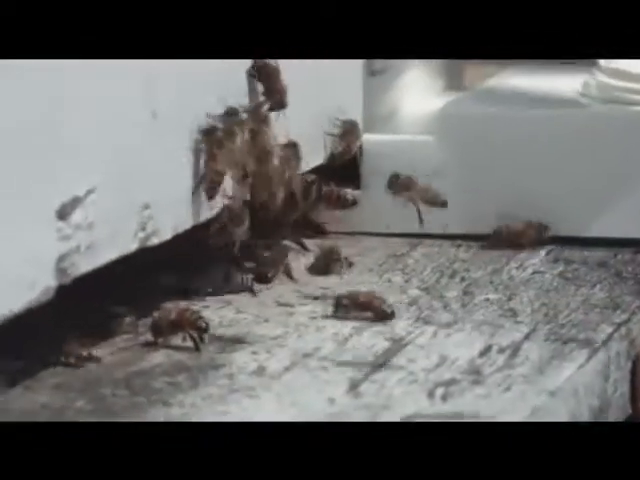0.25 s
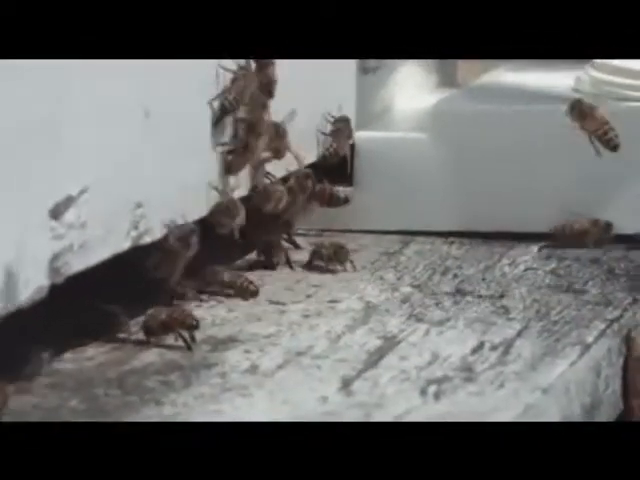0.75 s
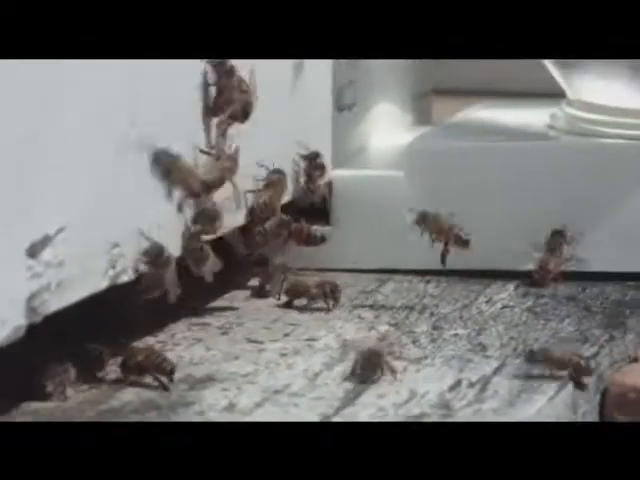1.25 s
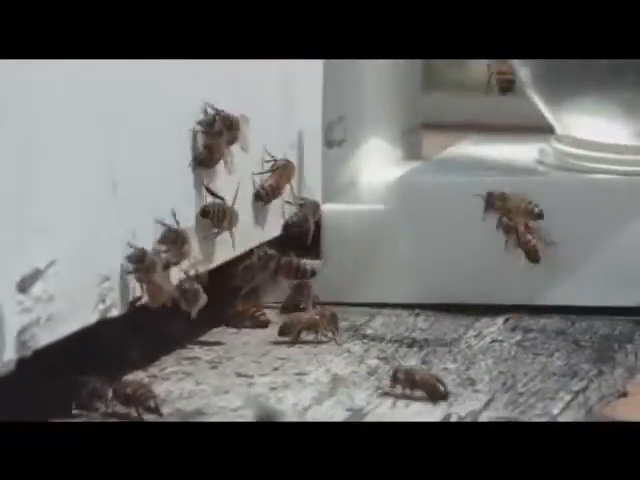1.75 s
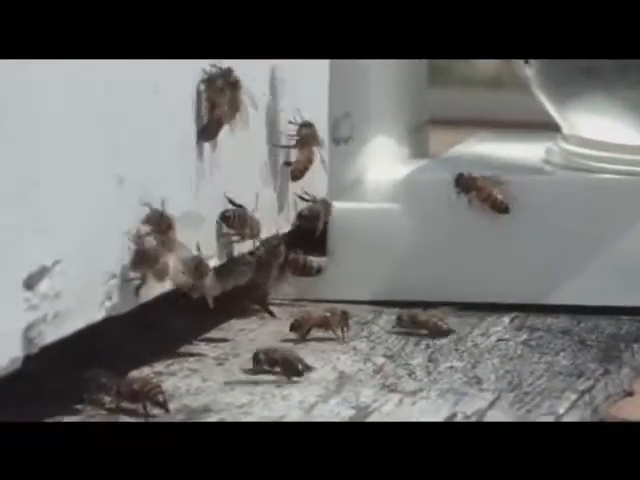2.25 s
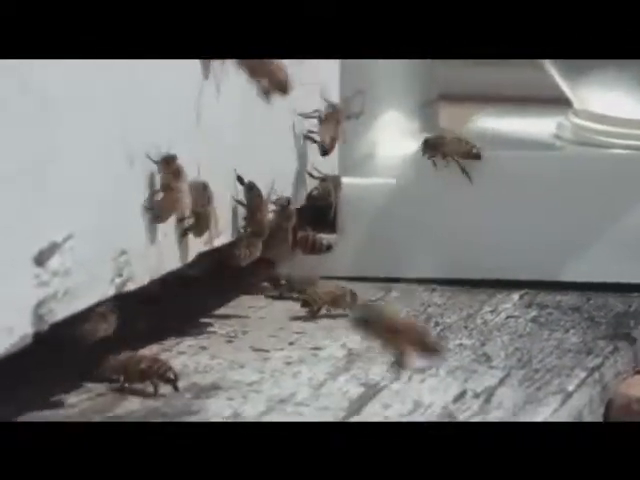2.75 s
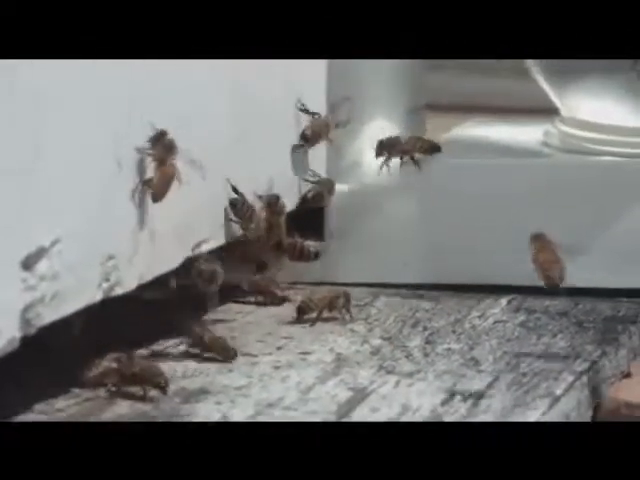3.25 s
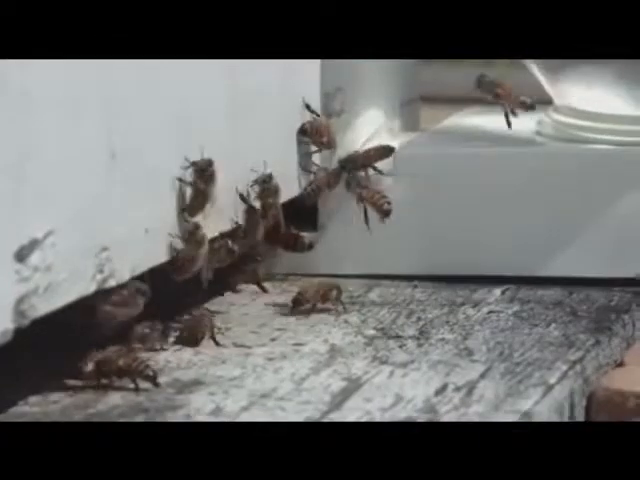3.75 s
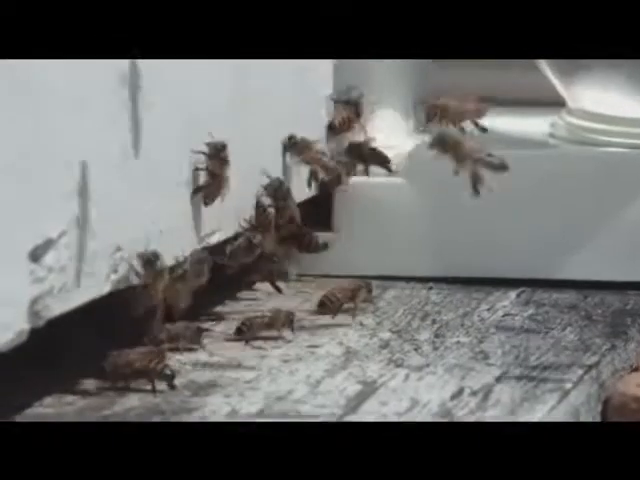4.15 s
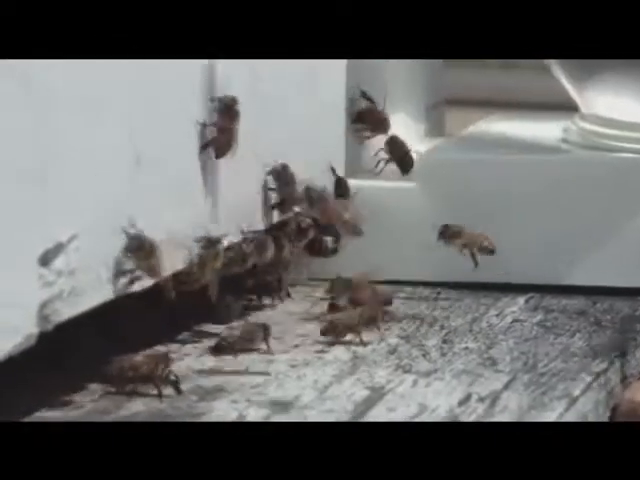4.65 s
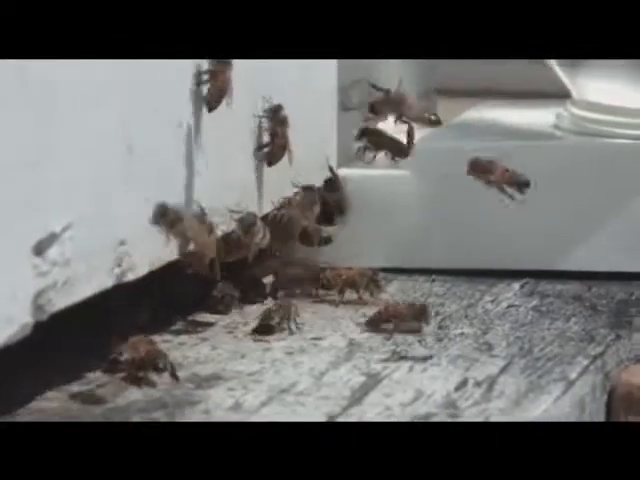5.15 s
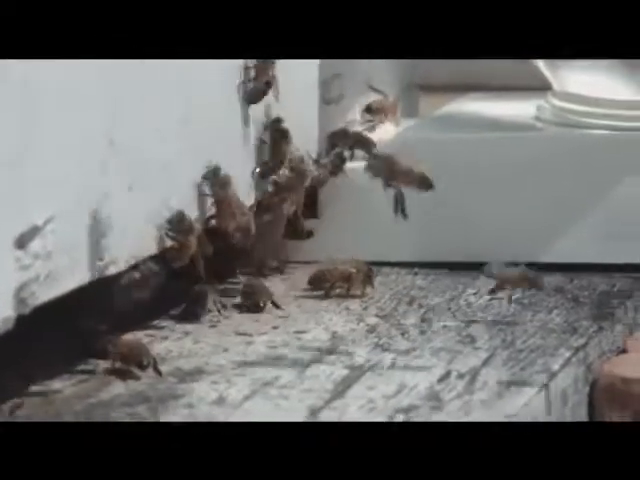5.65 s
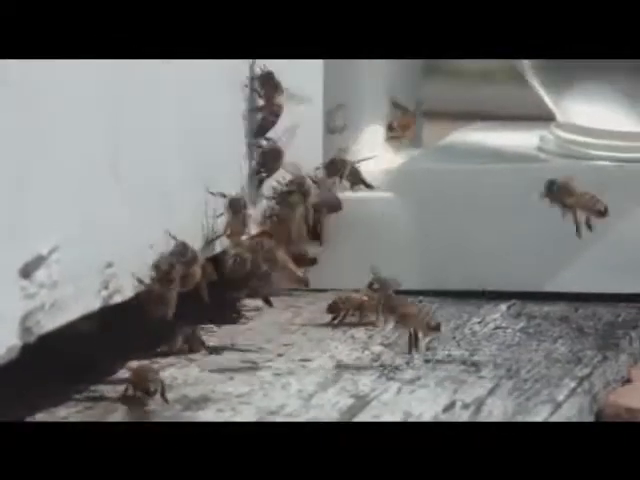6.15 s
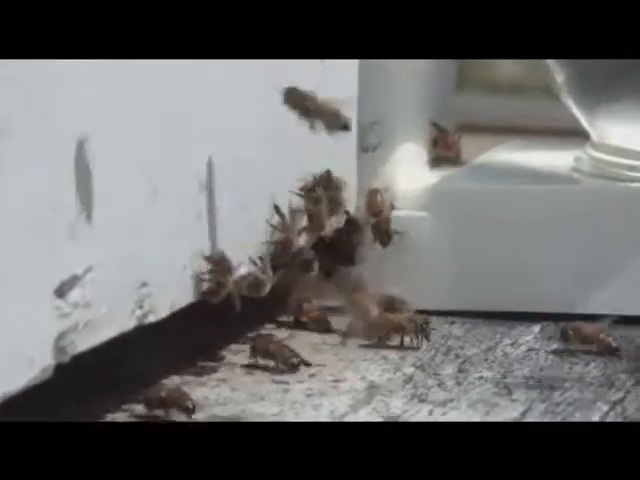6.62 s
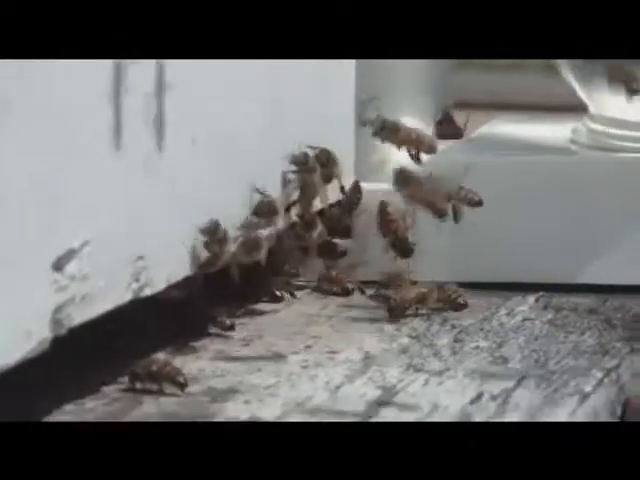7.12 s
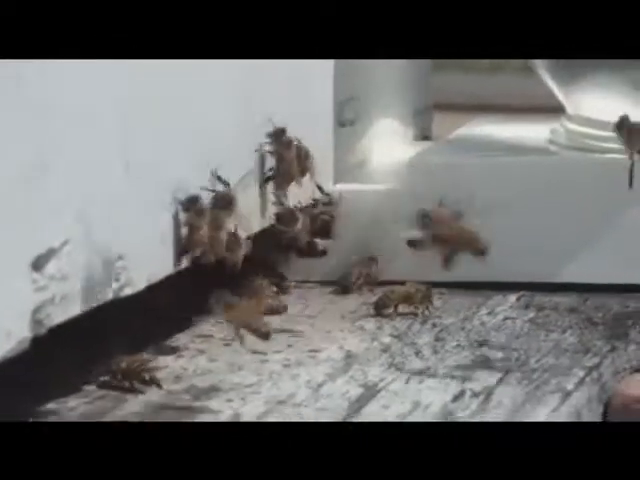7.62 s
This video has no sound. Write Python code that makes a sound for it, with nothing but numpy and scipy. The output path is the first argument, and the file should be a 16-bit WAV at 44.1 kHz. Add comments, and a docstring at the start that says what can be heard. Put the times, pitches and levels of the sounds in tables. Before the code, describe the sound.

At a hive entrance outdoors, the sound is quiet and dominated by low, uneven wind rumble on the microphone, over a steady soft hiss. Between about 0.1 and 0.5 seconds small hard clicks snap close by, the last ones sharpest. Throughout, many honey bees blur into a faint, wavering hum around 500 Hz, with single bees buzzing slightly nearer around 1.4, 4.4 and 6.3 seconds. Faint bird calls fall and warble between 2.2 and 2.9 seconds, with tiny high whistles from 3.5 to 4.2 and softer ones near 6. Gusts flutter and bump irregularly from 1.6 seconds on, with dull thumps strongest near 3.1 and 6.7. A distant frog- or insect-like trill ticks near 3 kHz, most distinct from 6.1 to 6.5 seconds. Hiss and hum swell from 6.15 to 6.7, then ease, and the bed continues to the end near 7.9.

```python
"""Hard clicks snap close by in the first half second, over hiss and rumbling wind outdoors.
Honey bees hover at a hive entrance: many drifting wingbeat harmonics blur into a hum near 500 Hz.
The wind is coloured noise under a gust curve, with short thumps on the microphone; the hiss is
random spectra fluttering with the wings. A far trill ticks near 3 kHz as tone bursts, and birds
warble faintly as gliding sines; the clicks are sums of decaying modes."""
import sys
import numpy as np
from scipy import signal
from scipy.fft import rfft, irfft, next_fast_len
from scipy.io import wavfile
from scipy.ndimage import uniform_filter1d

SR = 44100
rng = np.random.default_rng(int(sys.argv[2]) if len(sys.argv) > 2 else 0)


def generate_wav(sig):
    """Save sig (samples, or channels by samples) to the path in sys.argv[1] as 16-bit PCM at SR."""
    pcm = np.round(np.clip(np.atleast_2d(sig).T, -1, 1) * 32767).astype(np.int16)
    wavfile.write(sys.argv[1], SR, pcm)


N = 347544  # samples


def amp(db):
    """Decibel law: 20 dB is a factor of ten in amplitude."""
    return 10 ** (np.asarray(db) / 20)


def evened(x):
    """Normalisation to a root-mean-square of 1."""
    return x / np.sqrt(np.mean(x ** 2) + 1e-20)


def curve(rows, column):
    """Linear interpolation of one table column over time, sample by sample."""
    rows = np.asarray(rows)
    return np.interp(np.arange(N) / SR, rows[:, 0], rows[:, column])


def coloured(x, points):
    """Spectral shaping: gains drawn on a log-frequency axis, -90 dB below the lowest point."""
    f, db = np.transpose(points)
    size = next_fast_len(len(x))
    hz = np.fft.rfftfreq(size, 1 / SR)
    gain_db = np.interp(np.log(hz + 1), np.log(f + 1), db, -90, db[-1])
    return irfft(rfft(x, size) * amp(gain_db), size)[:len(x)]


def drift(rate_hz, count=20):
    """Superposition of random-phase sines up to rate_hz: a slow random curve of rms 1."""
    t = np.arange(0, N + 400, 200) / SR
    f = rate_hz * np.geomspace(.05, 1, count)
    phases = rng.random((count, 1))
    sines = np.sin(2 * np.pi * (f[:, None] * t + phases)) / np.sqrt(f[:, None])
    return np.interp(np.arange(N) / SR, t, evened(sines.sum(0)))


def add(mix, s, sound):
    """Linear superposition of a sound onto the mix from s seconds on."""
    part = mix[round(s * SR):][:len(sound)]
    part += sound[:len(part)]


WINGBEAT_HZ = 252.1  # mean wingbeat of the bees


def strokes(depth, count=3):
    """Amplitude modulation: each wing stroke of the nearest bees puffs air at their beat."""
    puffs = np.zeros(N)
    for _ in range(count):
        beat_hz = WINGBEAT_HZ * (1 + .045 * drift(2.5))
        puffs += amp(5.8 * drift(6.2)) * np.cos(2 * np.pi * np.cumsum(beat_hz) / SR)
    return 1 + depth * evened(puffs)


# Swell and level steps shared by hiss, blurred trill and blurred hum:
# t/s, treble level/dB, mid level/dB
SWELL_LEVELS = [(0, -1, 0.5), (.55, -1, -1), (1.45, 0.5, 0), (1.56, 2, 1), (2, -2, -1), (2.35, -1.5, 1),
                (2.52, 2, 0.5), (2.65, 0, 2), (3.05, 0.5, 2), (3.5, 0, 1), (4.2, 0.5, 1), (4.4, 2.5, .5),
                (4.42, 0.5, 1), (5.39, -1.5, 1), (5.41, 0.5, 1), (5.7, 1.5, 1), (6.14, 1.5, 0.5),
                (6.155, 5.5, 5), (6.7, 7, 7), (6.715, 3, 3.5), (6.9, 4, 2), (7.24, 4.5, 5),
                (7.26, 1.5, 1.5), (7.88, 1, 1.5)]


def hiss(points, level_db, column, patchy_db, flicker_db, flutter):
    """Random short-time spectra with soft drifting patches, a shared flicker and wing flutter."""
    frames = N // 256 + 5
    a, b, patches = rng.standard_normal((frames, 513, 3)).T
    patches = evened(uniform_filter1d(uniform_filter1d(patches, 20, 0), 14, 1))  # frequency, then time
    flicker = evened(uniform_filter1d(rng.standard_normal(frames), 5))
    spectra = (a + 1j * b) * amp(patchy_db * patches + flicker_db * flicker)
    noise = signal.istft(spectra, nperseg=1024, noverlap=768)[1][:N] * strokes(flutter)
    return amp(level_db + curve(SWELL_LEVELS, column)) * evened(coloured(noise, points))


# Spectral shape of the high hiss: f/Hz, relative level/dB per Hz
HISS_SPECTRUM = [(1500, -35), (2500, -11), (4100, -7.5), (5500, -6.5), (7000, -4), (8000, -1.5),
                 (10200, -2.5), (11200, -6.5), (12500, -10.5), (16000, -18.5)]
# Spectral shape of the far swarm and distant air: f/Hz, relative level/dB per Hz
WASH_SPECTRUM = [(150, -2), (260, -16), (310, 1.5), (420, 2.5), (620, -5), (780, -1.5), (1000, 0.5),
                 (1150, -5), (1350, -3.5), (1600, -4.5), (2100, -7.5), (2700, -7), (3600, -14.5),
                 (5500, -25.5)]


def air():
    """Broadband noise in two layers, a high hiss and the wash of far swarm and distant air."""
    high = hiss(HISS_SPECTRUM, -59.5, column=1, patchy_db=0.67, flicker_db=0.52, flutter=0.11)
    wash = hiss(WASH_SPECTRUM, -62, column=2, patchy_db=1.0, flicker_db=0.04, flutter=0.083)
    return high + wash


# Breeze between the gusts: t/s, deep level/dB, upper level/dB
BREEZE_LEVELS = [(0, -44, -43), (.9, -53, -45.5), (1.5, -46, -44.5), (2.1, -47.5, -44), (2.8, -40, -43.5),
                 (3.4, -45.5, -45.5), (4.0, -52, -45), (4.7, -38.5, -45), (5.3, -46.5, -44),
                 (6.0, -54, -44.5), (6.3, -58, -41.5), (6.6, -51, -41), (7.0, -54, -44.5),
                 (7.88, -50, -49.5)]
# Gusts: peak t/s, deep level/dB, upper level/dB, half-width/s (a lone gust's amplitude falls to 1/e)
GUST_BELLS = [(.03, -37.5, -42, 0.16), (.25, -40.5, -47, 0.11), (.57, -40, -46, 0.12),
              (.68, -41, -55, 0.022), (.77, -38, -44.5, 0.035), (1.02, -36.5, -43.5, 0.041),
              (1.12, -41, -45.5, 0.21), (1.59, -35, -42.5, 0.06), (1.86, -36.5, -38.5, 0.1),
              (2.018, -53, -35.5, 0.026), (2.15, -50, -40, 0.031), (2.289, -30, -35.5, 0.032),
              (2.43, -33.5, -35.5, 0.081), (2.681, -31, -38, 0.023), (2.98, -34, -48, 0.086),
              (3.108, -38, -27, 0.054), (3.26, -32.5, -36, 0.015), (3.33, -35, -41.5, 0.027),
              (3.57, -34.5, -40.5, 0.051), (3.73, -31.5, -39, 0.06), (3.86, -32, -33.5, 0.029),
              (4.0, -35, -39.5, 0.18), (4.24, -29.5, -38.5, 0.078), (4.32, -46, -34.5, 0.036),
              (4.37, -34, -44, 0.074), (4.65, -47, -34.5, 0.024), (4.9, -33.5, -48, 0.043),
              (5.06, -33, -54, 0.044), (5.5, -34.5, -46, 0.082), (5.7, -41.5, -62, 0.23),
              (6.06, -39, -40, 0.015), (6.54, -35.5, -44, 0.03), (6.69, -32, -30.5, 0.016),
              (6.765, -31, -39, 0.024), (6.93, -39.5, -53, 0.02), (7.13, -35.5, -57, 0.039),
              (7.48, -34.5, -49.5, 0.11), (7.81, -36, -46, 0.016)]


def blowing(column):
    """Power summation of the breeze and bell-shaped gusts gives the strength of the wind."""
    t = np.arange(0, N + 100, 100) / SR
    gusts = np.zeros(len(t))
    for row in GUST_BELLS:
        gusts += amp(2 * row[column]) * np.exp(-2 * ((t - row[0]) / row[3]) ** 2)
    breeze = amp(2 * curve(BREEZE_LEVELS, column))
    return np.sqrt(breeze + np.interp(np.arange(N) / SR, t, gusts))


def gusty(points, column, span, steadiness):
    """Envelope control: noise whose own lumps are partly evened out, so that the gust curve leads."""
    x = evened(coloured(rng.standard_normal(N), points))
    width = round(span * SR)
    power = uniform_filter1d(uniform_filter1d(x ** 2, width), width)
    return evened(x / (abs(power) + 0.065) ** (steadiness / 2)) * blowing(column)


# Spectral shape of the deep rumble: f/Hz, relative level/dB per Hz
DEEP_SPECTRUM = [(7.1, -7), (12, 0), (32, 5), (90, -8), (120, -38), (200, -120)]
# Spectral shape of the upper flutter: f/Hz, relative level/dB per Hz
UPPER_SPECTRUM = [(35, 0.5), (60, 1.5), (80, 5), (110, -1), (160, -10.5), (230, -18.5), (320, -35),
                  (500, -53), (900, -83)]
# Thumps: t/s, peak level/dB, delay until the spring back/s, sharpness/dB (added above 400 Hz)
WIND_THUMPS = [(1.882, -31, 0.0043, -28), (2.012, -34, 0.0039, -28), (2.449, -26.5, 0.0047, -16),
               (3.11, -18.5, 0.0067, -23.5), (3.872, -40, 0.004, -20), (4.033, -25.5, 0.0054, -27),
               (4.137, -34.5, .005, -23), (4.3, -32, 0.01, -24), (4.634, -45, 0.0063, -24),
               (6.058, -38, 0.0072, -20), (6.689, -19.5, 0.0063, -20)]
# Spectral filter of a thump before its sharpness: f/Hz, gain/dB
THUMP_FILTER = [(50, 10), (110, 12.5), (200, -4), (300, -10), (500, 3.5), (900, -7.5), (1500, -34),
                (2500, -70)]


def wind():
    """Turbulent pressure on the microphone: a deep lumpy rumble, an upper flutter and short thumps."""
    out = gusty(DEEP_SPECTRUM, column=1, span=0.062, steadiness=0.34)
    out += gusty(UPPER_SPECTRUM, column=2, span=0.13, steadiness=0.34)
    for s, db, length, sharp_db in WIND_THUMPS:
        push = np.zeros(4000)
        # the membrane is pushed in and springs back
        push[[2000, 2000 + round(length * SR)]] = 1, -.8
        points = [(hz, tilt_db + sharp_db * (hz > 400)) for hz, tilt_db in THUMP_FILTER]
        thump = coloured(push, points)
        add(out, s - 2000 / SR, amp(db) * thump / abs(thump).max())
    return out


def whistle(hz, db):
    """Phase integration of a pitch curve gives a tone, here with a fluttering level."""
    chance = rng.standard_normal(len(hz))
    flutter_db = 1.5 * evened(uniform_filter1d(uniform_filter1d(chance, 150), 150))
    tone = np.sin(2 * np.pi * np.cumsum(hz) / SR)
    return amp(db + flutter_db) * tone * signal.windows.tukey(len(hz), .1)


# Falling calls: start t/s, break t/s, end t/s, start f/Hz, break f/Hz,
# middle f/Hz of the first steps, start level/dB, break level/dB
FALLING_CALLS = [(2.218, 2.282, 2.345, 3050, 2480, 2400, -60, -64),
                 (2.446, 2.549, 2.635, 3400, 2560, 2560, -62, -57.5),
                 (2.725, 2.843, 2.915, 3350, 2480, 2150, -67, -57)]
# Faint whistles: start t/s, length/s, start f/Hz, end f/Hz, middle level/dB,
# warble depth f/Hz, warble rate f/Hz
FAR_WHISTLES = [(3.535, .03, 7800, 8000, -65, 30, 42), (3.592, 0.098, 7500, 7800, -62, 138.9, 34),
                (3.7, .075, 7700, 7950, -60, 40, 33), (3.743, .022, 7000, 7900, -56.5, 30, 36),
                (4.012, .035, 7050, 7950, -64, 30, 40), (4.18, 0.089, 2470, 2930, -66, 120, 37),
                (5.78, .07, 1800, 1810, -65.5, 30, 25), (6.138, .17, 1883, 1804, -61, 118.8, 46)]
# the glide: exponent of its bend, warble depth before smoothing, warble rate
SAG, WARBLE_HZ, WARBLE_PER_S = 1.3, 135, 100
# steps after the break, loud on the high side; depths before smoothing
STEP_HZ, STEPS_PER_S, STEP_DB = 240, 30, 5.5
# the steps sink and fade; the skew makes each rise faster than it falls
SINK_HZ_PER_S, FADE_DB_PER_S, STEP_SKEW = 2200, 150, .75


def birds():
    """Frequency modulation: calls fall, warble and end in steps, whistles glide; an echo blurs them."""
    out = np.zeros(N)
    for s, cut, end, from_hz, cut_hz, steps_hz, start_db, cut_db in FALLING_CALLS:
        t = np.arange(s, end, 1 / SR)
        left = np.clip((cut - t) / (cut - s), 0, 1)  # share of the glide still to come
        late = np.maximum(t - cut, 0)  # seconds since the break
        warble = WARBLE_HZ * np.sin(2 * np.pi * WARBLE_PER_S * t)
        glide = cut_hz + (from_hz - cut_hz) * left ** SAG + warble
        steps = -np.cos(2 * np.pi * (STEPS_PER_S * late % 1) ** STEP_SKEW) * (late > 0)
        hz = np.where(late > 0, steps_hz - SINK_HZ_PER_S * late + STEP_HZ * steps, glide)
        db = cut_db + (start_db - cut_db) * left - FADE_DB_PER_S * late + STEP_DB * steps
        add(out, s, whistle(uniform_filter1d(hz, size=120), uniform_filter1d(db, size=120)))
    for s, length, from_hz, to_hz, db, depth, rate in FAR_WHISTLES:
        t = np.arange(0, length, 1 / SR)
        hz = from_hz + (to_hz - from_hz) * t / length + depth * np.sin(2 * np.pi * rate * t)
        add(out, s, whistle(hz, db - 3.5 * abs(2 * t / length - 1)))  # softer at both ends
    # noise that decays by 60 dB in 46 ms
    echo = rng.standard_normal(6000) * amp(-60 * np.arange(6000) / SR / 0.046)
    return out + amp(-8.0) * signal.oaconvolve(out, echo / np.linalg.norm(echo))[:N]


def tick(hz, length=0.0026):
    """Gaussian tone burst: a bell envelope gives a short soft tick."""
    t = np.arange(800) / SR
    return np.sin(2 * np.pi * hz * t) * np.exp(-((t - 1.8 * length) / length) ** 2)


# Ticks that stand out: t/s (during the soft rise), envelope peak level/dB, f/Hz
NEAR_TICKS = [(3.0644, -56.5, 3000), (3.245, -58.5, 2780), (3.3967, -59, 2860), (3.4521, -58.5, 2900),
              (3.5593, -57, 2830), (4.7975, -61, 2920), (4.8489, -57.5, 2950), (4.9641, -62.5, 2970),
              (6.0821, -58.5, 2910), (6.13, -60.5, 2850), (6.1734, -48, 2890), (6.2193, -50, 2890),
              (6.271, -48, 2930), (6.3225, -50, 2970), (6.3779, -48.5, 2920), (6.4338, -52.5, 3000),
              (6.4714, -60.5, 2700), (7.2045, -57, 2740), (7.2734, -61.5, 2930)]
# Blurred far trill: t/s, level/dB under the swell
CHORUS_LEVELS = [(0, -73), (.6, -74.5), (1.8, -77), (2.3, -74), (2.6, -87), (3.3, -76), (4.0, -79),
                 (4.5, -81), (5.1, -75), (5.5, -79), (6.0, -72.5), (6.7, -84), (7.0, -75), (7.4, -70.5),
                 (7.88, -83)]
TRILL_PER_S, TRILL_HZ = 17, 2847  # tick rate and pitch, scaled for each voice


def trill():
    """Pulse trains of frogs or insects, about 17 ticks a second: near ones stand out, the rest blur."""
    out, far = np.zeros((2, N))
    for s, db, hz in NEAR_TICKS:
        add(out, s - .003, amp(db) * tick(hz))
    for voice in (.96, 1.0, 1.03, 1.06):
        rate = TRILL_PER_S * voice * (1 + .15 * drift(3.0))
        turns = np.cumsum(rate) / SR + rng.random()
        beats = np.diff(np.floor(turns), prepend=0)  # one pulse a turn
        far += signal.oaconvolve(beats * amp(1.1 * drift(9.3)), tick(TRILL_HZ * voice))[:N]
    return out + amp(curve(CHORUS_LEVELS, 1) + curve(SWELL_LEVELS, 1)) * evened(far)


# Hard clicks: t/s, peak level/dB, low ring level/dB, body ring level/dB (near 2.5 kHz), brightness/dB
HARD_CLICKS = [(0.085, -43.5, 3.5, 4, -11), (.2117, -52, -12, -6, -10), (.231, -48, -12, 5, 0),
               (0.3305, -48.5, -12, -4, -4), (.3673, -38, -8, -10, -9), (0.4538, -35.5, -12, -11, 5),
               (0.4547, -25, 1.5, -4, -19), (0.4835, -23.5, -10, 4, 5)]
# Modes of the object: f/Hz, level/dB before each click's colour, 60 dB decay time/s
RING_MODES = [(1650, -2.5, .03), (2430, -6.5, 0.014), (2630, 2.5, 0.0093), (3120, 4, 0.016),
              (3400, -3, 0.008), (3720, -1.5, 0.011), (4530, -7, 0.013), (5410, -5.5, 0.0065),
              (6420, -17, 0.01), (7360, -13.5, 0.0064), (9000, -5, 0.0025)]


def clicks():
    """Modal decay: a small hard object snaps and its modes ring for a few milliseconds."""
    out, t = np.zeros(N), np.arange(2000) / SR
    chances = rng.random((len(HARD_CLICKS), len(RING_MODES)))
    for (s, db, low_db, body_db, bright_db), chance in zip(HARD_CLICKS, chances):
        colour = [low_db, body_db, body_db, 0, 0, bright_db]
        ring = np.zeros(len(t))
        for (hz, mode_db, t60), c in zip(RING_MODES, chance):
            colour_db = np.interp(hz, [1700, 2300, 2700, 3000, 3400, 5000], colour)
            ring += amp(mode_db + colour_db - 60 * t / t60) * np.sin(2 * np.pi * (hz * t + 0.4 * c))
        ring *= np.minimum(t / 0.00053, 1)  # attack in seconds
        add(out, s, amp(db) * ring / abs(ring).max())
    return out


# Wingbeat harmonics: multiple of the wingbeat, relative level/dB
WING_HARMONICS = [(1, -5), (2, -1), (3, -12.5), (4, -19), (5, -10.5), (6, -17.5), (7, -19)]


def wings(beat_hz):
    """Harmonic series: one bee sounds at whole multiples of its wingbeat."""
    turns = np.cumsum(beat_hz) / SR + rng.random()
    return sum(amp(db) * np.cos(2 * np.pi * k * turns) for k, db in WING_HARMONICS)


# Blurred hum of the swarm: t/s, level/dB under the swell
SWARM_LEVELS = [(0, -66), (1.34, -63.5), (1.4, -63), (1.8, -63), (2.4, -64.5), (3.1, -60), (3.6, -60.5),
                (4.0, -63), (4.4, -60), (4.8, -60.5), (4.9, -66.5), (5.55, -61.5), (6.1, -63), (6.2, -60),
                (6.6, -64), (7.0, -63.5), (7.55, -61.5), (7.88, -64.5)]
# Single bees passing close: start t/s, length/s, start wingbeat f/Hz, end wingbeat f/Hz,
# mid-pass bend f/Hz, share of the pass where it is nearest, gain there/dB on the wing harmonics
CLOSE_PASSES = [(1.32, 0.251, 250.3, 234, -3, 0.31, -58), (1.4, 0.448, 250, 252.2, 10, 0.38, -61),
                (1.78, .5, 208, 200, -5.5, 0.87, -67), (2.3, 0.73, 206, 228, 8, .25, -63.5),
                (2.58, 0.43, 262, 249, -4.5, 0.49, -63), (4.3, 0.31, 200, 192, -5, 0.63, -54.5),
                (6.15, 0.45, 248, 265, 4.5, .4, -58), (6.22, 0.38, 217.5, 214, 2, .3, -61),
                (6.72, .48, 250, 233, -4.5, 0.24, -64), (7.45, .35, 242, 252, 9, 0.37, -63)]
SPREAD, WANDER, HOVER_DB = .072, .02, 3.5  # half-range of beats (share), beat drift (share), level drift


def swarm(count=22):
    """Incoherent superposition: bees at their own drifting beats and levels blur; a few pass close."""
    hum = np.zeros(N)
    for place in np.linspace(-1, 1, count):
        beat_hz = WINGBEAT_HZ * (1 + SPREAD * place + WANDER * drift(12.0))
        hum += amp(HOVER_DB * drift(9.0)) * wings(beat_hz)
    hum = amp(curve(SWARM_LEVELS, 1) + curve(SWELL_LEVELS, 1)) * evened(hum)
    for s, length, from_hz, to_hz, bend, nearest, db in CLOSE_PASSES:
        u = np.arange(0, length, 1 / SR) / length  # share of the pass
        hz = from_hz + (to_hz - from_hz) * u + bend * np.sin(np.pi * u)
        level_db = db + np.interp(u, [0, nearest, 1], [-11.5, 0, -11.5])
        jitter = drift(30.4)[:len(u)]  # unsteady flight shakes level and beat
        bee = wings(hz * (1 + 0.0089 * jitter[::-1]))
        add(hum, s, amp(level_db + 2.4 * jitter) * bee * signal.windows.tukey(len(u), .2))
    return hum


def scene():
    """Linear superposition of all sources in one microphone."""
    return (air() + swarm() + wind() + clicks() + trill() + birds())[None]


EDGE_HZ = 15120  # upper band limit
OFFSET = -.0014  # steady offset of the converter, of full scale


def record(dry):
    """Linear-phase low-pass filtering limits the band; a small constant offset is added."""
    low_pass = signal.firwin(1023, EDGE_HZ, window=("kaiser", 9), fs=SR)
    return signal.oaconvolve(dry, low_pass[None], "same") + OFFSET


dry = scene()
out = record(dry)
generate_wav(out)
```